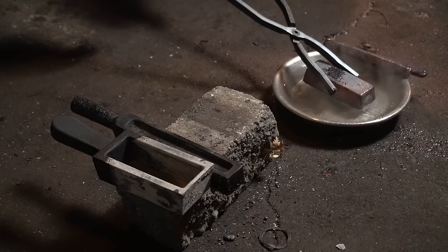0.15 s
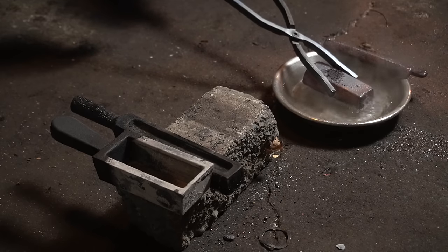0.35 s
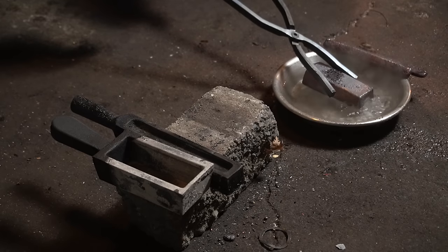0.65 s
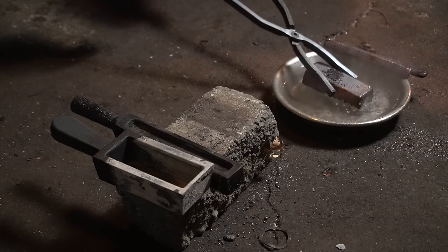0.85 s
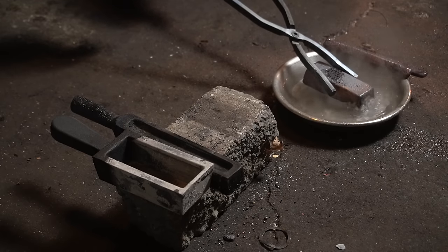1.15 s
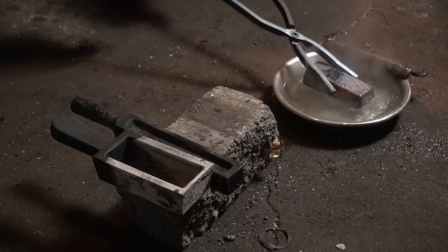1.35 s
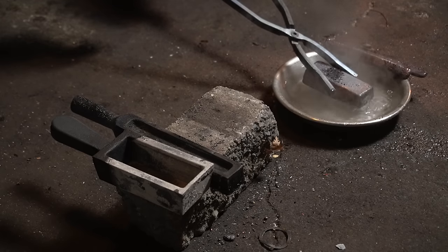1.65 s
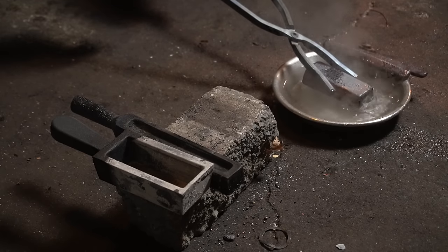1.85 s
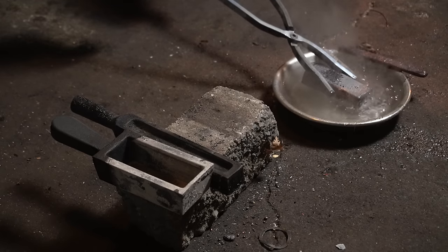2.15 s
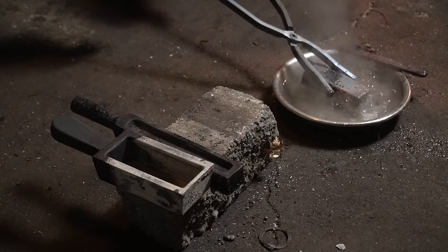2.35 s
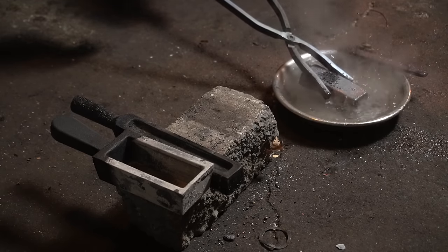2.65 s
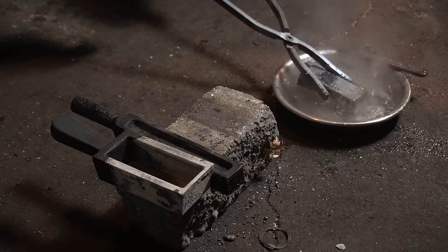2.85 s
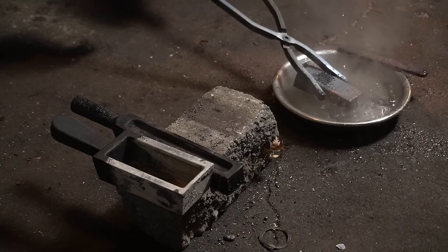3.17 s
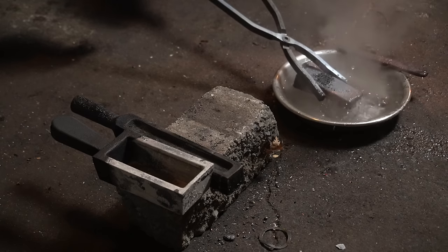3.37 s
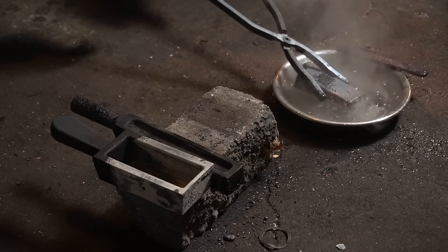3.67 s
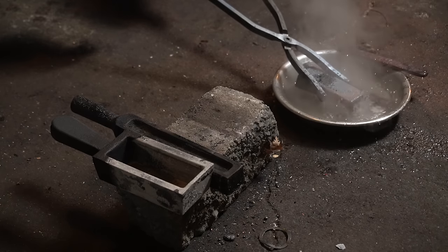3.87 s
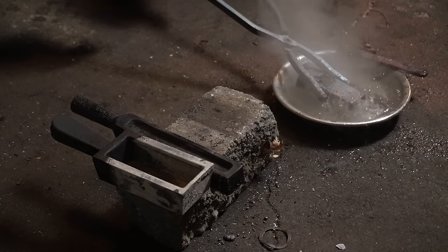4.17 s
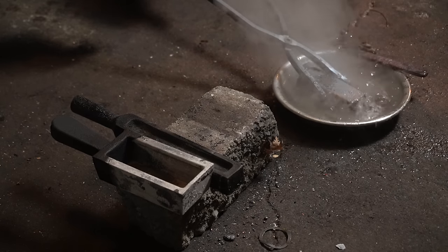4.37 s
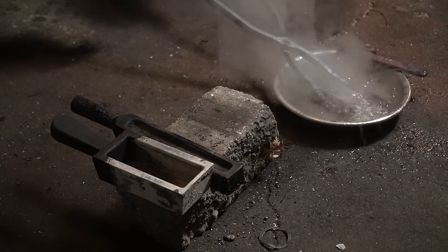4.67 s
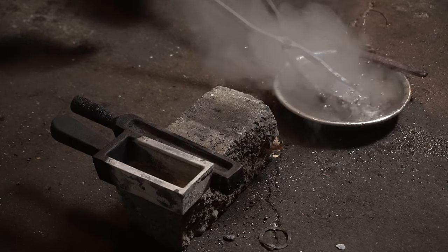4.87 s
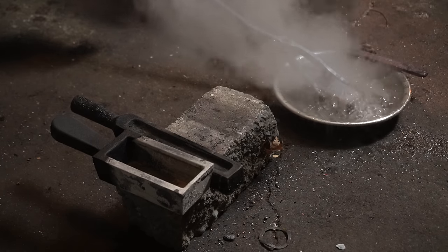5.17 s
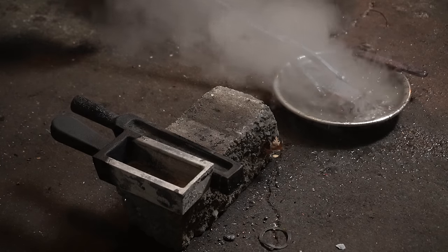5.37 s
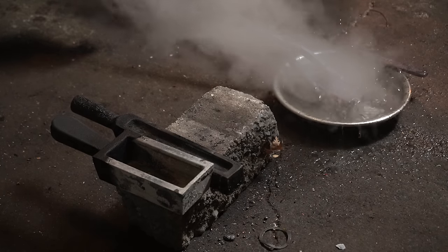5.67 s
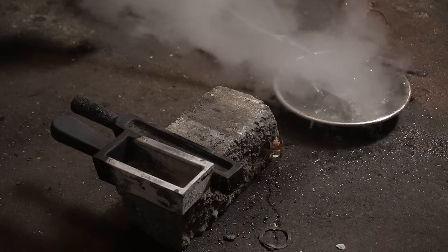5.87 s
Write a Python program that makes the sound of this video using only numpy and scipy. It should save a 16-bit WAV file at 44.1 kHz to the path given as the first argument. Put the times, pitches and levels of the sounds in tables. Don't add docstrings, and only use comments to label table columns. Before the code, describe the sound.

Close-up quenching of hot metal: crisp fizzing steam, a quick scraping clank on the pan, and bubbling that deepens to a watery belch.

```python
import sys
import numpy as np
from scipy import signal
from scipy.fft import rfft, irfft, next_fast_len
from scipy.io import wavfile
from scipy.ndimage import uniform_filter1d, map_coordinates

SR = 44100
rng = np.random.default_rng(int(sys.argv[2]) if len(sys.argv) > 2 else 0)


def how_loud(loudness_db):
    steps = np.asarray(loudness_db, float) / 20
    return 10 ** steps


def master_out(mix):
    frames = np.transpose(np.atleast_2d(mix))
    ceiling = np.clip(frames, -1, 1)
    pcm = np.round(ceiling * 32767).astype(np.int16)
    wavfile.write(sys.argv[1], SR, pcm)


N = 265614


def unit(x):
    return x / np.sqrt(np.mean(x ** 2) + 1e-20)


def along(points, hz):
    f, v = np.transpose(points)
    return np.interp(np.log(hz + 1), np.log(f + 1), v)


def curves(rows):
    s, *cols = np.transpose(rows)
    return [np.interp(np.arange(N) / SR, s, c) for c in cols]


def wobble(rate_hz):
    return map_coordinates(rng.standard_normal(400), [np.arange(N) * min(rate_hz, 60) / SR])


def filtered(x, response):
    m = next_fast_len(N + SR // 2)
    return irfft(rfft(x, m) * response(np.fft.rfftfreq(m, 1 / SR)), m)[..., :N]


def bubbles(s, size, hz, cycles, rise):
    k = np.arange(260)
    turns = hz[:, None] * k / SR
    age = turns / cycles[:, None]
    envelope = size[:, None] * age * np.exp(1 - 3 * age)
    wave = envelope * np.sin(2 * np.pi * turns * (1 + rise * age / 2))
    at = (s * SR).astype(int)[:, None] + k
    return np.bincount(at.ravel(), wave.ravel(), N + SR)[:N]


# (time [s], strength [dB], brightness [dB/octave])
FILM = [(0, -40.5, -2), (0.25, -40, -0.5), (0.5, -37.5, 4), (0.8, -34.5, 2.5), (1.25, -33.5, 0.5),
        (1.9, -34, 3.5), (2.25, -34, -1), (2.5, -33, 1.5), (2.8, -32, -3), (3.3, -35, 6), (3.75, -34.5, 2),
        (4.1, -34, 1), (4.63, -33, -2), (4.67, -39, -4), (4.78, -37, -3), (5.35, -34.5, -5), (5.75, -35, 0),
        (6.02, -34.5, -3.5)]
# (time [s], radius [mm])
LARGEST = [
    (0, 1.75),
    (.45, 2.21),
    (.72, 2.86),
    (.9, 4.46),
    (1.6, 6.3),
    (2.8, 10.3),
    (4, 12),
    (4.6, 18.5),
    (6.02, 17),
]
BELCH_S, BELCH_RISE_S, BELCH_FALL_S = 5.983, .006, 0.029
LANDED_S, LANDING_S = 2.16, .04


def boil():
    strength_db, brightness = curves(FILM)
    mm = curves(LARGEST)[0]
    s = np.arange(N) / SR
    belch = np.exp(-((s - BELCH_S) / np.where(s < BELCH_S, BELCH_RISE_S, BELCH_FALL_S)) ** 2)
    landed = (1 + np.tanh((s - LANDED_S) / LANDING_S)) / 2
    vapour = steam(s, strength_db, brightness, mm, belch, landed)
    return filtered(vapour + water(s, mm, belch, landed), pan_ring)


# (frequency [Hz], density [dB/Hz])
FIZZ_SPECTRUM = [(4500, -31), (6500, 1), (7300, -5), (8000, -0.5), (8900, 0), (11200, 1), (12500, -2),
                 (14000, -7), (15800, -10), (17000, -8)]
# (frequency [Hz], density [dB/Hz])
HISS_SPECTRUM = [(1500, -60), (1900, -26), (2400, -12), (3200, -6), (3800, 2), (4300, -2), (5100, 0),
                 (5800, 1.5), (7000, -4), (8000, -7.5), (9000, -15.5), (12000, -28)]
FIZZ_DB, FIZZ_PER_BRIGHTNESS, LANDED_FIZZ_DB = 2, 0.35, -3
FIZZ_DB_PER_DOUBLING = -1.05
BELCH_STEAM_DB, BELCH_FIZZ_DB = -4.5, -7


def steam(s, strength_db, brightness, mm, belch, landed):
    def tilted(hz, t):
        tilt_db = np.interp(t, s, brightness) * np.log2((hz + 200) / 4600)
        return venting(hz, t) * how_loud(tilt_db)

    hiss_db = strength_db + BELCH_STEAM_DB * belch
    fizz_db = hiss_db + FIZZ_DB + FIZZ_PER_BRIGHTNESS * brightness
    fizz_db = fizz_db + FIZZ_DB_PER_DOUBLING * np.log2(mm)
    fizz_db = fizz_db + BELCH_FIZZ_DB * belch + LANDED_FIZZ_DB * landed
    fizz_grains = crackle(count=12000, hz=9950, cycles=2.4, spread_db=5.5)
    hiss_grains = crackle(count=6000, hz=4517, cycles=7.9, spread_db=2.0)
    fizz = unit(puffs(FIZZ_SPECTRUM, fizz_grains, share=0.15, patchy_db=1.37, gain=venting))
    hiss = unit(puffs(HISS_SPECTRUM, hiss_grains, share=0.26, patchy_db=0.84, gain=tilted))
    flutter_db = 0.76 * wobble(45) + 0.5 * wobble(58)
    fizz = how_loud(fizz_db + 0.66 * flutter_db + 0.33 * wobble(30)) * fizz
    hiss = how_loud(hiss_db + 0.74 * flutter_db) * hiss
    return (fizz + hiss) * how_loud(0.57 * wobble(36))


# (frequency [Hz], density [dB/Hz])
BUBBLING_SPECTRUM = [(30, 14.5), (200, -11), (500, -6), (820, -8.5), (1200, -0.5), (1500, -7), (2300, -3),
                     (3200, -4), (5000, -19)]
# (frequency [Hz], density [dB/Hz])
GURGLE_SPECTRUM = [(25, -24), (60, -9), (95, -12), (125, 1.5), (160, -8), (200, -1), (300, -2), (450, -12),
                   (900, -50)]
BUBBLING_DB, SHALLOW_DB, SHALLOW_S = -35.5, -7, 0.68
GURGLE_DB, GURGLE_DB_PER_DOUBLING = -96.5, 9
OUTSIZE_DB, BREAKUP_DB, BREAKUP_MM, BREAKUP_SPREAD = -17, 13.5, 3.45, 0.67
STIRRED_DB, STIRRED_S = 1.5, 0.92
BELCH_WATER_DB, BELCH_GURGLE_DB, BELCH_SWELL = 8, 9, 1


def water(s, mm, belch, landed):
    breakup = np.exp(-(np.log(mm / BREAKUP_MM) / BREAKUP_SPREAD) ** 2)
    outsize_db = OUTSIZE_DB + BREAKUP_DB * breakup

    def none_larger(hz, t):
        under = 3260 / np.interp(t, s, mm * (1 + BELCH_SWELL * belch)) / (hz + 1)
        outsize = how_loud(2 * np.interp(t, s, outsize_db)) / (1 + under ** 2.0)
        largest = 1 + 0.3 * np.exp(-(np.log(under * 1.06) / 0.19) ** 2)
        return venting(hz, t) * np.sqrt(largest / (1 + under ** 14) + outsize)

    bubbling_db = BUBBLING_DB + SHALLOW_DB * np.exp(-(s / SHALLOW_S) ** 2) + BELCH_WATER_DB * belch
    bubbling_db = bubbling_db + STIRRED_DB * landed * np.exp(-((s - LANDED_S) / STIRRED_S) ** 2)
    gurgle_db = GURGLE_DB + GURGLE_DB_PER_DOUBLING * np.log2(mm) + BELCH_GURGLE_DB * belch
    grains = crackle(count=4000, hz=1626, cycles=4.96, spread_db=1.0)
    bubbling = puffs(BUBBLING_SPECTRUM, grains, share=0.076, patchy_db=0.64, gain=none_larger)
    noise = rng.standard_normal((2, N))
    gurgle = unit(filtered(noise, lambda hz: how_loud(along(GURGLE_SPECTRUM, hz))))
    return how_loud(bubbling_db) * bubbling + how_loud(gurgle_db) * gurgle


def crackle(count, hz, cycles, spread_db):
    u, g = rng.random((count, 2)), rng.standard_normal(count)
    size = how_loud(-spread_db * np.log(u[:, 1] + 0.024))
    pitch_hz = np.clip(hz * np.exp(0.346 * g), 300, 15000)
    return unit(bubbles(u[:, 0] * N / SR, size, pitch_hz, np.full(count, cycles), rise=0.21))


def puffs(spectrum, grains, share, patchy_db, gain):
    hz, t, z = signal.stft(rng.standard_normal((2, N)), SR, nperseg=512)
    patches = uniform_filter1d(rng.standard_normal(z.shape[1:]), size=12, axis=0)
    patches = uniform_filter1d(patches, size=3, axis=1)
    heard = signal.stft(grains, SR, nperseg=512)[2]
    power = uniform_filter1d(np.mean(abs(heard) ** 2, 1), size=9)
    heard = heard / np.sqrt(power + 1e-9)[:, None]
    heard = heard * np.sqrt(np.mean(abs(z) ** 2))
    share = np.clip(share, 0, 1)
    z[0] = np.sqrt(1 - share) * z[0] + np.sqrt(share) * heard
    z = z * how_loud(along(spectrum, hz))[:, None] * how_loud(patchy_db * unit(patches))
    z = z / np.sqrt(np.mean(abs(z) ** 2)) * gain(hz[:, None], t)
    return signal.istft(z, SR, nperseg=512)[1][:, :N] / np.sqrt(len(hz))


# (time [s], centre [Hz], swell [dB])
POCKETS = [(0.653, 14060, 5), (0.852, 6330, 6), (0.948, 5330, 10), (1.297, 8150, 7), (1.421, 4330, -3),
           (1.616, 6000, 5), (1.672, 5710, -6), (1.75, 5710, 7), (1.834, 5910, 7.5), (2.403, 11420, -6),
           (2.426, 3820, 7), (2.504, 3400, -4), (2.772, 3390, 4), (2.826, 4900, -8), (3.001, 11820, 7.5),
           (3.37, 9270, -6), (3.526, 5330, 5.5), (3.773, 6790, -8), (3.811, 3280, 6.5), (4.109, 8300, 4.5),
           (4.18, 3900, 6), (4.378, 4480, 4.5), (4.552, 2240, 6), (4.903, 4480, 6), (5.045, 8360, 10),
           (5.242, 9940, 7), (5.41, 7030, 6), (5.448, 6120, 10.5), (5.635, 8300, 8), (5.869, 2570, -8)]
# (time [s], centre [Hz], swell [dB], half length [s])
SMOTHER = (4.7, 6100, -5, .045)
POP_PUFF_S, POP_PUFF_DB, POP_PUFF_GROWS = 0.0042, 8.5, 0.21
PUFF_HALF_S = 0.0099


def venting(hz, t):
    octave = np.log2((hz + 50) / 4800)
    swell_db = np.zeros((len(hz), len(t)))
    after_bursts = [(s + POP_PUFF_S, pitch, POP_PUFF_DB + POP_PUFF_GROWS * db) for s, db, pitch in BURSTS]
    events = [(*puff, PUFF_HALF_S) for puff in POCKETS + after_bursts] + [SMOTHER]
    for s, centre_hz, db, half_s in events:
        near = abs(t - s) < .12
        across = np.exp(-(np.log2((hz + 50) / centre_hz) / 0.54) ** 2)
        swell_db[:, near] += db * across * np.exp(-((t[near] - s - 0.0032 * octave) / half_s) ** 2)
    return how_loud(0.76 * swell_db)


# (frequency [Hz], width [Hz], gain [dB])
PAN_MODES = [(194, 35, 4), (364, 51, 5), (469, 24, 5.5), (518, 16, 5.5), (618, 19, 4.5), (691, 38, 5),
             (731, 28, 8), (939, 17, 1.5), (1051, 26, 6.5), (1250.5, 16, 6.5), (1284, 32, 5.5),
             (1415, 40, 4), (1613, 25, 6), (1740, 22, 9), (1865, 25, 6.5), (1934, 25, 6.5), (2120, 57, -3),
             (2198, 32, 5), (2320, 37, 0), (2450, 19, 6.5), (2800, 13, -4), (2848, 24, 5.5), (3090, 28, 7),
             (3425, 20, 6), (3630, 33, 0.5), (3770, 28, -9.5), (4270, 42, 7), (4500, 36, 6), (4970, 20, 5),
             (7890, 350, 3.5)]
# (frequency [Hz], width [Hz], gain [dB])
CANCELLATIONS = [(98, 11, -0.5), (168, 20, -4.5), (251.5, 27, -7.5), (281, 15, -6), (430, 18.6, -12),
                 (491, 16, -8.5), (580, 13, -4.5), (640, 16, -5), (806, 33, -5), (970, 13, -3.5),
                 (1477, 92, -2), (1703, 72, -6.5), (1854, 37, -8), (2483, 32, -13.5)]


def pan_ring(hz):
    return how_loud(sum(db / (1 + (2 * (hz - c) / w) ** 2) for c, w, db in PAN_MODES + CANCELLATIONS))


# (time [s], peak [dB], pitch [Hz], t60 [s])
HITS = [
    (2.0123, -25, 1980, 0.036),
    (2.0744, -9.5, 2400, 0.011),
    (2.1013, -11.5, 2280, 0.018),
    (2.134, -17.5, 2090, 0.02),
]
# (frequency [Hz], level [dB], t60 [s])
RIM_MODES = [(1623, -13, 0.096), (2660, -9.5, 0.1), (3147, -12, 0.18), (3700, -9.5, 0.047)]


def ingot():
    hits, t = np.zeros(N + SR), np.arange(SR // 8) / SR
    for s, db, hz, t60 in HITS:
        clank = np.sin(2 * np.pi * hz * t) * how_loud(-60 * t / t60)
        rim = sum(how_loud(level_db - 60 * t / life_s) * np.sin(2 * np.pi * rim_hz * t)
                  for rim_hz, level_db, life_s in RIM_MODES)
        crack = .5 * how_loud(-60 * t / 0.0078) * rng.standard_normal(len(t))
        hits[round(s * SR):][:len(t)] -= how_loud(db - 5.5) * (clank + rim + crack)
    damped = filtered(hits[:N], lambda hz: (1j * hz / (900 + 1j * hz) / (1 + 1j * hz / 5000)) ** 2)
    # (frequency [Hz], density [dB/Hz])
    slide = [(300, -33), (600, -1.5), (1000, -4), (1600, 4.0), (2300, 6), (3100, -1), (4500, -2.5), (8000, -42)]
    rough = rng.standard_normal(N) * how_loud(wobble(55))
    grind = filtered(rough, lambda hz: how_loud(along(slide, hz)) * pan_ring(hz))
    return 1.53 * damped + skids() * unit(grind)


SKID_DB, SKID_PER_KNOCK = -26, 0.35
SKID_RISE_S, SKID_HOLD_S, SKID_FADE_DB_PER_S = .004, .024, 420


def skids():
    s, db = np.transpose(HITS)[:2, :, None]
    age_s = np.arange(N) / SR - s
    fade_db = SKID_FADE_DB_PER_S * np.clip(age_s - SKID_HOLD_S, 0, 1)
    level = how_loud(SKID_DB + SKID_PER_KNOCK * db - fade_db)
    return np.max(level * np.clip(age_s / SKID_RISE_S, 0, 1), axis=0)


# (time [s], peak [dB], pitch [Hz])
BURSTS = [(0.8504, -26, 4140), (1.3784, -14, 5970), (1.5144, -11, 5300), (1.7913, -14, 5360),
          (2.3794, -16, 5940), (2.6204, -27, 4500), (2.8964, -12, 3270), (2.971, -15, 3640),
          (3.0315, -11, 3500), (3.069, -18, 3500), (4.0033, -23, 3630), (4.4504, -26, 3360),
          (5.0494, -24, 3380), (5.1544, -27, 3060), (5.706, -9, 5030), (5.902, -15, 5810)]


def pops():
    s, db, hz = np.transpose(BURSTS)
    return bubbles(s, how_loud(db - 5.0), hz, cycles=np.full(len(s), 15.), rise=0.064)


# (time [s], strength [dB])
COLLAPSES = [(0.3347, -16), (0.6652, -13), (1.097, -12), (1.5575, -12), (2.3826, -10), (2.6712, -12),
             (3.054, -12), (3.6767, -12), (3.9899, -11), (4.7366, -15), (5.0511, -9), (5.2419, -11),
             (5.7078, -11), (5.9034, -10)]


def snaps():
    s, db = np.transpose(COLLAPSES)
    return bubbles(s, how_loud(db), hz=np.full(len(s), 5200.), cycles=np.full(len(s), 2.3), rise=0.1)


# (frequency [Hz], correlation [0-1])
LIKENESS = [(60, .9995), (290, .998), (640, 0.98), (1400, 0.955), (2200, .915), (3100, 0.93), (4000, 0.93),
            (5000, 0.82), (7000, 0.68), (10000, 0.6), (12000, 0.24), (13500, 0.52), (15500, 0.69)]
# (frequency [Hz], difference [dB])
LEVEL_LEAN = [(200, 0), (640, -0.8), (1400, -0.7), (3100, 0), (5500, 0), (8000, -1.5), (11000, -7),
              (13000, -2.5), (15500, -2)]
# (frequency [Hz], phase [rad])
PHASE_LEAD = [(300, 0), (4100, -0.44), (5000, -0.23), (6700, 0.42), (8300, -1.3), (11400, -1.04),
              (12400, -0.16), (16000, -0.18)]


def ports(direct, scattered):
    side = np.array([[1], [-1]])

    def turn(hz):
        return np.arccos(np.clip(along(LIKENESS, hz), 0, 1)) / 2

    def aim(hz):
        return how_loud(side * along(LEVEL_LEAN, hz) / 2) * np.exp(side * .5j * along(PHASE_LEAD, hz))

    common = filtered(direct, lambda hz: aim(hz) * np.cos(turn(hz)))
    opposed = filtered(scattered, lambda hz: side * aim(hz) * np.sin(turn(hz)))
    return common + opposed


def walls(x):
    t = np.arange(SR // 5) / SR
    tail = rng.standard_normal((2, len(t))) * how_loud(-60 * t / 0.18) * (t > .003)
    tail = signal.sosfilt(signal.butter(4, 4200, "high", fs=SR, output="sos"), tail)
    return signal.fftconvolve(x, tail / np.linalg.norm(tail[0]), axes=1)[:, :N]


# (frequency [Hz], density [dB/Hz])
RUMBLE = [(15, -22), (30, -24), (64, 2), (100, -4), (160, -24), (250, -18), (900, -11), (1200, -35)]


def distance():
    return how_loud(-77.5) * unit(filtered(rng.standard_normal(N), lambda hz: how_loud(along(RUMBLE, hz))))


def scene():
    direct, scattered = boil()
    solid = ingot() + pops() + snaps()
    near = ports(direct + solid, scattered + .5 * np.roll(solid, 180))
    return near + how_loud(-11.5) * walls(near) + distance()


def low_pass(x):
    return signal.sosfilt(signal.butter(12, 16800, fs=SR, output="sos"), x)


def record(dry):
    mix = filtered(dry, lambda hz: hz < 15780)
    return low_pass(mix)


dry = scene()
out = record(dry)
master_out(out)
```